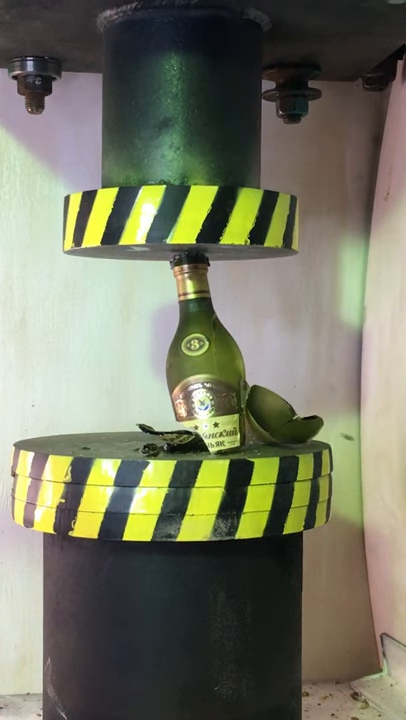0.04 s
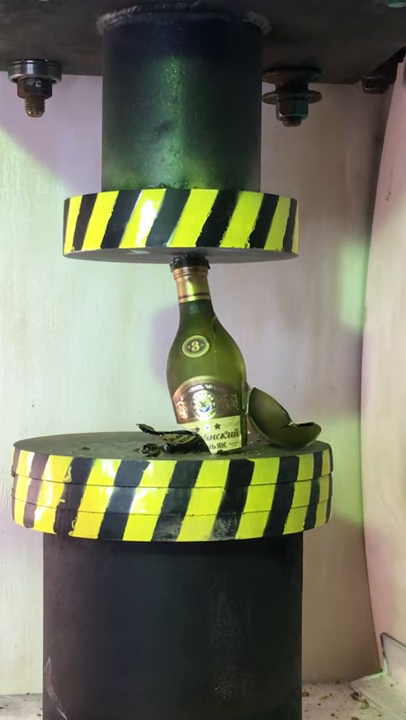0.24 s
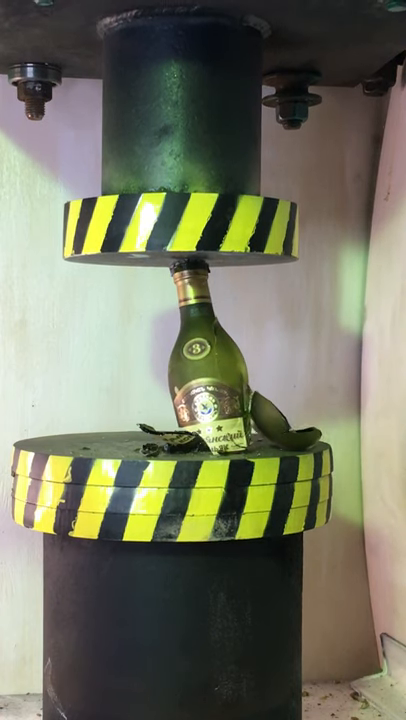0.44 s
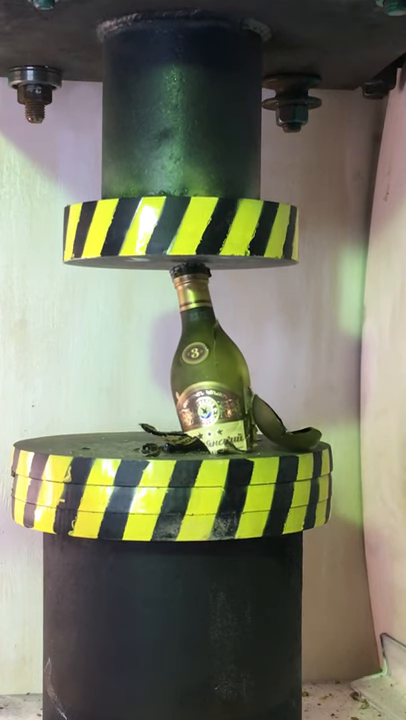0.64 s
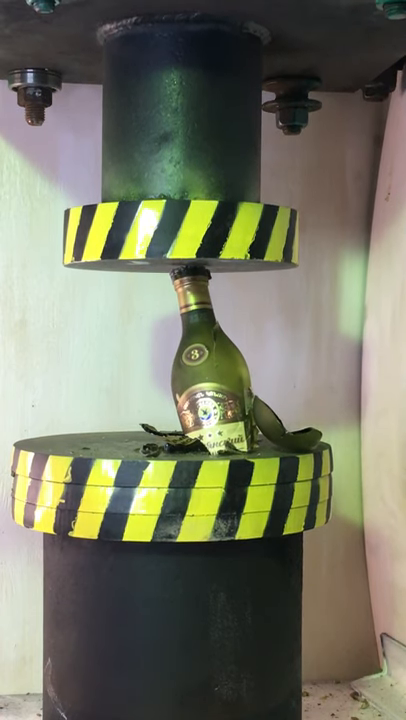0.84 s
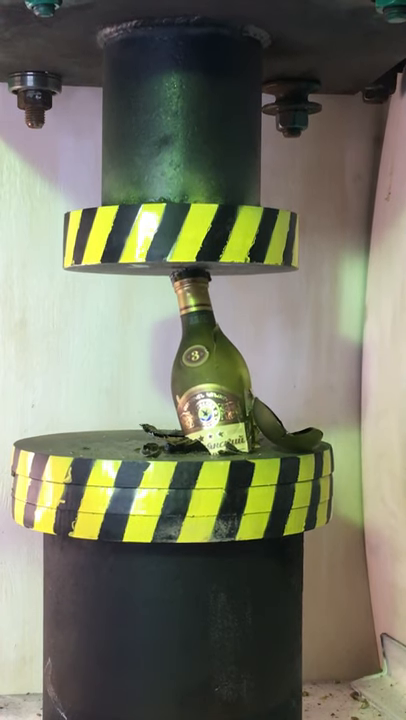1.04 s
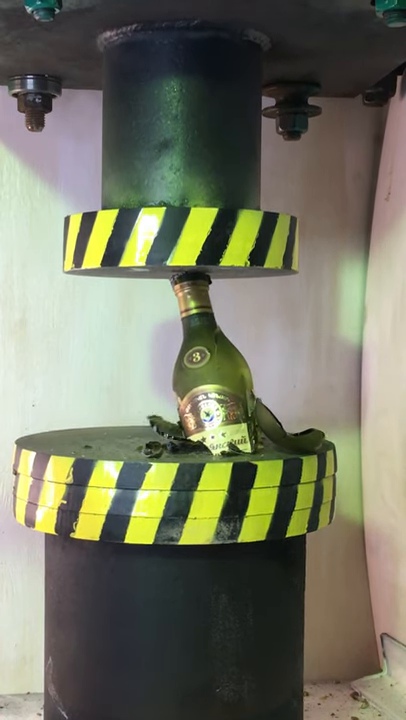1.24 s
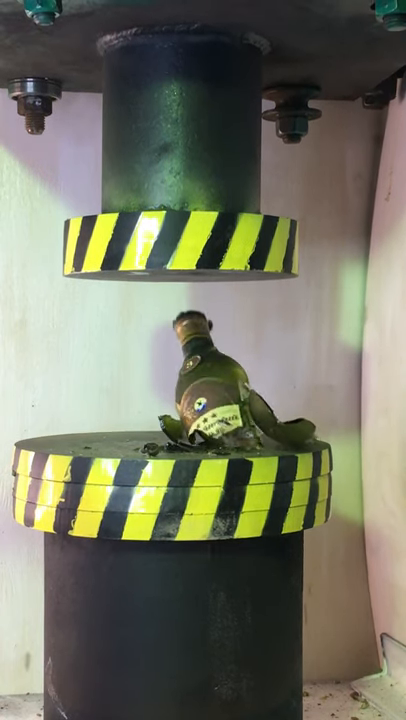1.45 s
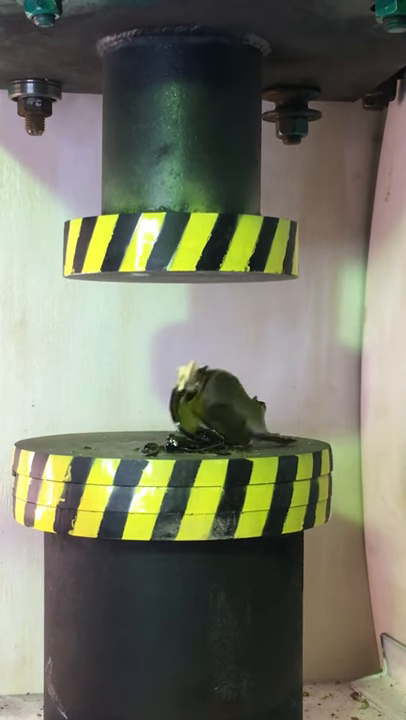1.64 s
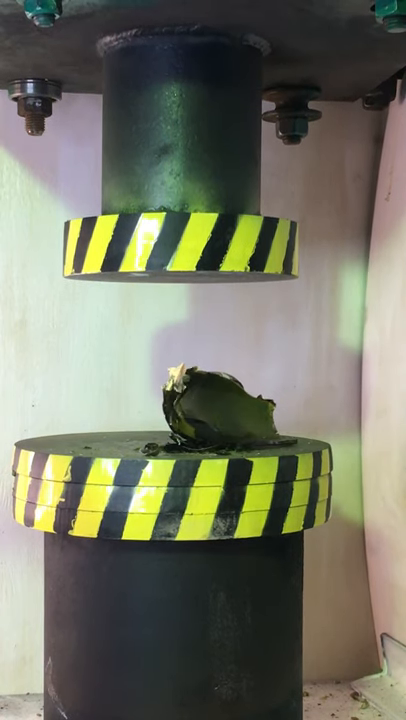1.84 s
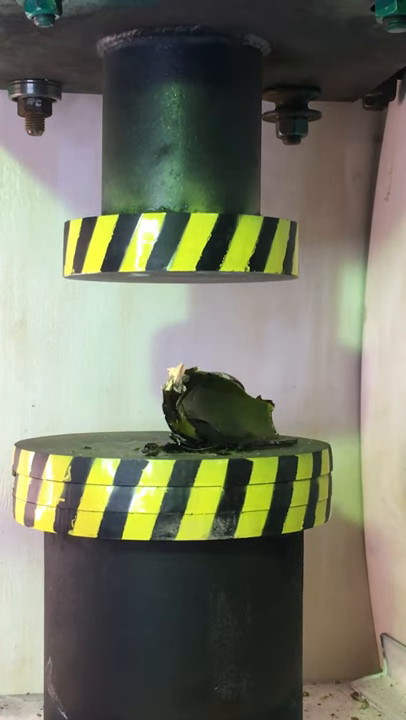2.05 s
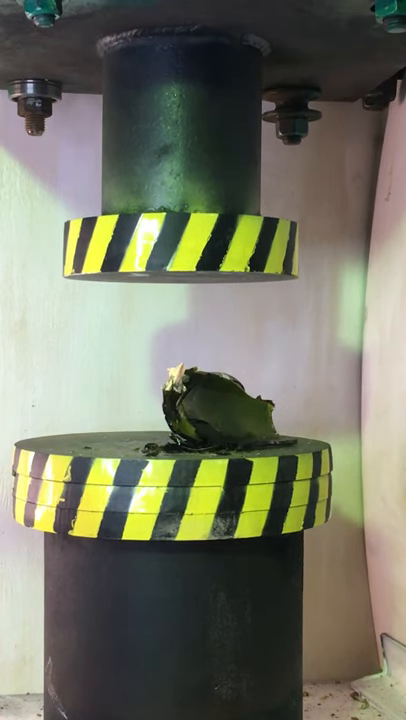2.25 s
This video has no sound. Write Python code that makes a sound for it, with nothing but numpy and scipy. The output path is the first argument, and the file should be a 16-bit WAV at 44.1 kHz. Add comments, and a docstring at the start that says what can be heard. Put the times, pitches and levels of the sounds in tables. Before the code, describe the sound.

Close mono sound of a bottle breaking in a hydraulic press; bright snaps quicken into a dense shattering crunch, shards tick afterwards, while the motor pump drones on with a dull room echo.

```python
"""In a workshop, a hydraulic press crushes a glass bottle while its pump hums: steady tones, noise and a rumble.
Clicks with short echoes make the glass crackle and snap; filtered noise makes a loose piece knock about.
The bottle bursts in heavier knocks and a dense shower of random clicks, and the press frame shudders.
A few shards tick and ring; the unloaded pump whistles briefly and for a moment runs slightly faster.
The glass also has a dull room echo."""
import sys
import numpy as np
from scipy import signal
from scipy.fft import rfft, irfft, next_fast_len
from scipy.io import wavfile
from scipy.ndimage import map_coordinates

SR = 44100
rng = np.random.default_rng(int(sys.argv[2]) if len(sys.argv) > 2 else 0)


def wav_out(sig):
    """Save sig, one row per channel (or a flat mono array), as 16-bit PCM at SR to the path in sys.argv[1]."""
    wavfile.write(sys.argv[1], SR, np.round(np.clip(np.atleast_2d(sig).T, -1, 1) * 32767).astype(np.int16))


N = 101429

BREAK_RIPPLE_DB = 4  # strength of the random resonances in the knocks and the crunch


def amp(db):
    """Turn decibels into a gain."""
    return 10 ** (np.asarray(db) / 20)


def unit(x):
    """Scale x to an average (rms) level of 1."""
    return x / np.sqrt(np.mean(x ** 2) + 1e-20)


def curve(rows):
    """Draw straight lines between (seconds, value) rows, one value per sample."""
    seconds, values = np.transpose(rows)
    return np.interp(np.arange(N) / SR, seconds, values)


def wobble(rate):
    """A smooth random curve through `rate` random points a second."""
    points = rng.standard_normal(int(N * rate / SR) + 4)
    return map_coordinates(points, [np.arange(N) * rate / SR])


def random_spectrum(hz, step_hz):
    """Random heights along the frequency axis, one every step_hz, joined by straight lines."""
    knots = np.arange(0, SR, step_hz)
    return np.interp(hz, knots, rng.standard_normal(len(knots)))


def coloured(x, points, ripple_db=0):
    """Filter x by (Hz, dB) points and random resonances, mostly narrow ones, then scale to rms 1."""
    hz = np.fft.rfftfreq(len(x), 1 / SR)
    f, db = np.transpose(points)
    broad = random_spectrum(hz, 450)
    narrow = random_spectrum(hz, 70)
    # both kinds grow with frequency, the broad ones only high up
    ripple = narrow * hz / (hz + 1000) + broad * hz / (hz + 12000)
    filter_db = np.interp(np.log(hz + 1), np.log(f), db) + ripple_db * ripple
    return unit(irfft(rfft(x) * amp(filter_db), len(x)))


def event_time():
    """Time in seconds along one short event."""
    return np.arange(8192) / SR


def add(track, s, x):
    """Mix x into the track, starting at s seconds."""
    part = track[max(round(s * SR), 0):][:len(x)]
    part += x[:len(part)]


def grains(per_s, spread_db):
    """Single-sample clicks at random moments, with random sign and uneven size."""
    happens = rng.random(N) < per_s / SR
    sign = np.sign(rng.standard_normal(N))
    return happens * sign * amp(spread_db * rng.standard_normal(N))


def pump_tones(load):
    """A turning pump sounds at multiples of its pitch; load changes the balance between them."""
    # Pump speed. Each row: time in seconds, pitch in Hz.
    pitch_hz = [(0, 178), (1.65, 178.5), (1.72, 179.3), (1.97, 179.1), (2.08, 178)]
    # Change of the whine, the tones above 2.5 times the pitch. Each row: time in seconds, change in dB.
    whine = [(0, 0), (1.35, 0.5), (1.55, -3.5), (1.65, -0.5), (1.78, -2), (1.92, -5.5), (2.0, -0.5),
             (2.3, -1.5)]
    # Change of the tone at twice the pitch. Each row: time in seconds, change in dB.
    hum = [(1.5, -0.5), (1.66, 6), (1.82, 3), (1.95, -2), (2.03, 2)]
    # Pump tones. Each row: multiple of the pitch (rounded to the nearest half when played),
    # level in dB under full load, level in dB when idle.
    orders = [(.5, -51, -47.5), (1, -42, -47.5), (1.5, -56, -47), (2.003, -38, -39), (4, -37, -38.5),
              (5, -41.5, -51), (6, -46.5, -37), (8, -38.5, -32), (10, -42, -46.5), (11, -59, -52.5),
              (12, -54.5, -49), (13, -53, -50), (14, -47, -60), (15, -53, -52), (16, -45.5, -43.5),
              (17, -45, -47), (19, -48.5, -66), (20, -57.5, -48.5)]
    waver_db, waver_hz = .8, .12  # unsteadiness of each tone's level and of the pitch
    phase = 2 * np.pi * np.cumsum(curve(pitch_hz) + waver_hz * wobble(23.74)) / SR
    whine_db, hum_db = curve(whine), curve(hum)
    tones = np.zeros(N)
    for k, loaded_db, idle_db in orders:
        halves = round(2 * k)
        db = idle_db + load * (loaded_db - idle_db)
        db = db + whine_db * (k > 2.5) + hum_db * (halves == 4) + waver_db * wobble(26.85)
        start_phase = 2 * np.pi * rng.random()
        tones += np.sqrt(2) * amp(db) * np.sin(halves / 2 * phase + start_phase)
    return tones


def pump_rush(load):
    """Oil and fan make a steady rush of noise, blended from a loaded and an idle sound."""
    # Colour of the rush under load. Each row: frequency in Hz, relative level in dB.
    loaded_colour = [(20, -36), (36, -24), (52, -5), (95, 3.5), (150, -7), (270, 2), (450, -7.5),
                     (600, -2.5), (1000, -9.5), (1450, -0.5), (2400, -8.5), (3100, -10), (4000, -15.5),
                     (5000, -23), (9500, -21.5), (11000, -40), (16000, -34)]
    # Colour of the rush when idle. Each row: frequency in Hz, relative level in dB.
    idle_colour = [(20, -26), (52, 9.5), (95, 1), (170, -1), (270, -3.5), (450, -10.5), (900, -8.5),
                   (1500, -13), (2100, -16.5), (3100, -13.5), (4200, -22), (6000, -23), (9500, -39),
                   (11500, -44), (16000, -57)]
    loaded_db, idle_db = -34.5, -35  # rms levels at full load and at no load
    loaded = amp(loaded_db) * coloured(rng.standard_normal(N), loaded_colour)
    idle = amp(idle_db) * coloured(rng.standard_normal(N), idle_colour)
    # square roots blend the two by power
    return np.sqrt(load) * loaded + np.sqrt(1 - load) * idle


def motor_rumble():
    """The motor gives one low tone whose pitch and level wander."""
    # Level of the rumble before it wanders. Each row: time in seconds, level in dB.
    level = [(0, -38), (.15, -38), (.35, -43), (.9, -44.5), (1.3, -53), (2.3, -54)]
    middle_hz = 58
    phase = 2 * np.pi * np.cumsum(middle_hz + 3 * wobble(15.5)) / SR
    return np.sqrt(2) * amp(curve(level) + 1.7 * wobble(25.5)) * np.sin(phase)


def pump():
    """The load shapes the pump's tones and rush, over the motor's rumble."""
    # How hard the pump works. Each row: time in seconds, load from 0 to 1.
    load_points = [(0, 0.88), (.4, 0.79), (1.35, 0.73), (1.55, 0.76), (1.8, 0.34), (2.0, 0.17)]
    load = np.clip(curve(load_points), 0, 1)
    return pump_tones(load) + pump_rush(load) + motor_rumble()


def click(colour, t60, chamber_db):
    """A sharp click, its echo off the plate and the ring of the chamber, as fading noise."""
    plate_s, plate_gain = .0024, .9  # delay in seconds and strength of the plate echo
    chamber_t60 = 0.11  # seconds for the ring to fall by 60 dB
    snap_ripple_db = 4.5  # strength of the random resonances
    t = event_time()
    direct = amp(-60 * t / t60)
    echo = plate_gain * (t > plate_s) * amp(-60 * abs(t - plate_s) / t60)
    chamber = amp(chamber_db - 60 * t / chamber_t60)
    shape = np.sqrt(direct ** 2 + echo ** 2 + chamber ** 2)
    ring = shape * coloured(rng.standard_normal(len(t)), colour, snap_ripple_db)
    # give the noise the same energy as its outline
    return ring * np.linalg.norm(shape) / np.linalg.norm(ring)


def fine_crackle():
    """Growing cracks make a stream of tiny random clicks with an unsteady level."""
    # Level of the crackle before it wavers. Each row: time in seconds, level in dB.
    level = [(0, -46), (.14, -46), (.175, -33), (.205, -51), (.26, -26), (.28, -35), (.33, -24.5),
             (.39, -55), (.5, -42), (.55, -50), (.6, -46), (.69, -52), (.85, -47), (.89, -43), (.98, -41),
             (1.12, -37), (1.2, -41.5), (1.32, -30), (1.46, -66), (1.7, -60), (1.745, -41), (1.8, -71)]
    # Colour of the crackle. Each row: frequency in Hz, relative level in dB.
    colour = [(300, -24), (2200, 5), (4800, -4.5), (6200, 2), (8000, -5), (10700, -2), (11400, -1.5),
              (13300, -5), (15500, -9)]
    per_s, spread_db, ripple_db = 2200, 3.3, 4  # clicks a second, scatter of size, random resonances
    crackle = coloured(grains(per_s, spread_db), colour, ripple_db)
    return amp(curve(level) + 2.1 * wobble(140)) * crackle


def cracking():
    """Each crack snaps brightly and also rings the bottle's body, amid fine crackle."""
    # Snaps of the glass. Each row: start in seconds, level in dB, mid-range body relative to the snap in dB.
    snaps = [(0.218, -26, -5), (.2395, -30, -14), (0.2508, -23, -15), (0.3414, -13.5, -18),
             (0.3743, -23.5, -22), (.437, -31, -12), (0.454, -28, -21), (0.459, -30, -6), (.476, -9, -13.5),
             (0.6542, -37, 5), (.724, -37.5, 10), (0.8038, -31.5, 1.5), (0.865, -21.5, -13),
             (.9135, -18, -5.5), (.952, -24.5, -5), (.965, -24.5, -5), (0.9738, -25, -23),
             (1.029, -21.5, -1.5), (1.136, -30, -1), (1.1624, -13, -5), (1.2206, -20, -4),
             (1.2244, -16, -2.5), (1.245, -24, -8), (1.27, -12, -9), (1.291, -15, -9), (1.3, -15.5, -16),
             (1.304, -16, -4.5), (1.3765, -23, -6)]
    # Colour of the bright snap. Each row: frequency in Hz, relative level in dB.
    snap_colour = [(300, -42), (1500, -3.5), (4500, -8), (6200, 0.5), (9000, 1), (10500, 0), (12300, 1.5),
                   (13700, -3), (15000, -1.5), (15800, 2.5)]
    # Colour of the bottle's body. Each row: frequency in Hz, relative level in dB.
    body_colour = [(200, -53), (1000, -13), (1800, -23), (2250, 4.5), (2650, 0.5), (3200, -12), (4200, -11),
                   (8000, -38)]
    snap_t60, body_t60 = 0.023, 0.015  # seconds for the direct sound to fall by 60 dB
    chamber_db = -8  # chamber ring, relative to the direct sound
    out = fine_crackle()
    for s, db, body_db in snaps:
        snap = click(snap_colour, snap_t60, chamber_db)
        body = amp(body_db) * click(body_colour, body_t60, chamber_db)
        add(out, s, amp(db) * (snap + body))
    return out


def hollow(x):
    """The bottle's curved wall boosts x around its resonances; the result has rms 1."""
    # Resonances of the bottle's wall: a plain list of frequencies in Hz.
    wall_hz = [1890, 2260, 3200, 3590]
    half_width_hz, boost_db = 70, 4.5
    hz = np.fft.rfftfreq(len(x), 1 / SR)
    lift_db = boost_db * sum(1 / (1 + ((hz - f) / half_width_hz) ** 2) for f in wall_hz)
    return unit(irfft(rfft(x) * amp(lift_db), len(x)))


def crunch():
    """A shower of fractures, gritty while the glass gives a little and dense when the bottle bursts."""
    # Dull crunch, first the loose piece, then the whole bottle. Each row: time in seconds, level in dB.
    collapse = [(.34, -70), (.365, -34.5), (.58, -36), (.8, -57), (1.325, -50.5), (1.335, -19.5),
                (1.355, -14.5), (1.385, -14), (1.42, -17.5), (1.447, -18.5), (1.475, -33), (1.57, -46.5),
                (1.61, -44.5), (1.665, -32), (1.70, -36.5), (1.9, -50.5)]
    # Colour of the crunch. Each row: frequency in Hz, relative level in dB.
    colour = [(25, -30), (60, -3), (110, 6.5), (190, -3.5), (280, 1), (1000, 0), (1900, -1.5), (3900, -4.5),
              (5000, -13.5), (6500, -14), (10000, -31), (15000, -39)]
    added_per_s, least_per_s = 6000, 200  # fractures a second: added at the loudest moment, always present
    thinning = 1.1  # the added rate follows the strength to this power
    spread_db, flutter_db = 2.2, .8  # scatter of fracture size, unsteadiness of the crunch
    strength = amp(curve(collapse))
    per_s = added_per_s * (strength / strength.max()) ** thinning + least_per_s
    # more clicks would be louder: divide so that strength alone sets the level
    fractures = grains(per_s, spread_db) / np.sqrt(per_s)
    texture = hollow(coloured(fractures, colour, BREAK_RIPPLE_DB))
    return strength * amp(flutter_db * wobble(150)) * texture


def breaking():
    """Large pieces knock, each lower band a little later than the one above, amid the crunch."""
    # Dull knocks of large pieces. Each row: start in seconds, level in dB,
    # seconds to fall by 60 dB, treble tilt in dB per octave (well above tilt_hz).
    knocks = [(0.365, -16.5, 0.052, -9.5), (0.432, -19, 0.08, -6), (0.4764, -18.5, 0.038, -12),
              (.495, -16, 0.04, -6), (.543, -13.5, 0.039, -2), (0.578, -18.5, 0.04, -12),
              (.613, -23, 0.064, -8), (.898, -24, 0.096, -8.5), (1.3302, -6, 0.035, 0),
              (1.345, -9, 0.097, 7.5), (1.352, -11.5, 0.031, -13), (1.406, -6.5, 0.062, 3.5),
              (1.4252, -6, 0.028, 4.5), (1.4961, -17, 0.042, -2), (1.656, -20, 0.075, -8.5)]
    # Colour of a knock before its tilt. Each row: frequency in Hz, relative level in dB.
    knock_colour = [(80, -19), (300, -6), (1000, -4), (2300, 0), (4100, -3), (5100, -10), (7000, -22),
                    (12000, -54)]
    # Edges between the frequency bands, from high to low: a plain list in Hz.
    band_edges = [16000, 2800, 1800, 1000, 0]
    rise_s, lag_s = .001, .0013  # time constant of the onset, delay from one band to the next
    tilt_hz = 1000
    out, t = crunch(), event_time()
    hz = np.fft.rfftfreq(len(t), 1 / SR)
    for s, db, t60, tilt_db in knocks:
        colour = [(f, level + tilt_db * np.log2(1 + f / tilt_hz)) for f, level in knock_colour]
        ring = hollow(coloured(rng.standard_normal(len(t)), colour, BREAK_RIPPLE_DB))
        shape = amp(db - 60 * t / t60) * (1 - np.exp(-t / rise_s))
        # the shaped noise gets the energy of its outline
        spectrum = rfft(ring) * np.linalg.norm(shape) / np.linalg.norm(shape * ring)
        for k, (hi, lo) in enumerate(zip(band_edges, band_edges[1:])):
            band = irfft(spectrum * (hz >= lo) * (hz < hi))
            add(out, s + k * lag_s, shape * band)
    return out


def shudder():
    """Once the load lets go the press frame shudders: a low rumble of noise that slowly dies away."""
    # Colour of the shudder. Each row: frequency in Hz, relative level in dB.
    colour = [(40, -23), (110, 1), (260, 7.5), (430, -5), (600, 6), (1500, -37)]
    start_s, start_db, t60 = 1.36, -33.5, 3.4  # t60: seconds to fall by 60 dB
    t = np.arange(N) / SR - start_s
    fade = (t > 0) * amp(start_db - 60 * abs(t) / t60)
    return fade * coloured(rng.standard_normal(N), colour)


def shards():
    """Small pieces tick on the steel as clicks; a few splinters ring as fading pure tones."""
    # Shards landing. Each row: start in seconds, level in dB.
    landings = [(1.5515, -31.5), (1.5867, -26.5), (1.61, -34), (1.651, -26), (1.693, -19), (1.7495, -33.5)]
    # Colour of a shard's tick. Each row: frequency in Hz, relative level in dB.
    tick_colour = [(1000, -16), (4200, -1), (4900, -10), (5800, 4), (9500, -3), (12500, -6), (15000, -17)]
    # Ringing splinters. Each row: start in seconds, pitch in Hz, level in dB, seconds to fall by 60 dB.
    rings = [(1.379, 12850, -20, 0.039), (1.749, 7630, -37, 0.086)]
    tick_t60, chamber_db = .012, -13.5  # seconds to fall by 60 dB, chamber ring relative to the tick
    out, t = np.zeros(N), event_time()
    for s, db in landings:
        add(out, s, amp(db) * click(tick_colour, tick_t60, chamber_db))
    for s, hz, db, t60 in rings:
        add(out, s, amp(db - 60 * t / t60) * np.sin(2 * np.pi * hz * t))
    return out


def whistle():
    """A thin oil whistle, one pure tone, swells and fades as the oil pressure falls."""
    start, end = 1.77, 1.98  # seconds
    pitch_hz, level_db = 1616, -32.5  # the swell peaks at half of this level's gain
    t = np.arange(N) / SR
    progress = np.clip((t - start) / (end - start), 0, 1)
    swell = np.sqrt(progress * (1 - progress))
    return amp(level_db) * swell * np.sin(2 * np.pi * pitch_hz * t)


def workshop(x):
    """The room answers with a dull tail: many dense echoes, imitated by fading noise."""
    # Colour of the workshop echo. Each row: frequency in Hz, relative level in dB.
    room_colour = [(80, 8), (250, 2), (1000, 2), (4000, -9), (15000, -55)]
    room_db, room_t60 = -22.5, 0.56  # echo level, seconds to fall by 60 dB
    t = np.arange(SR) / SR
    tail = coloured(rng.standard_normal(SR), room_colour) * amp(-60 * t / room_t60)
    return amp(room_db) * signal.fftconvolve(x, tail / np.linalg.norm(tail))[:N]


def scene():
    """Press and bottle in one channel; only the glass is sent to the room echo."""
    glass = cracking() + breaking() + shards()
    return (pump() + glass + shudder() + whistle() + workshop(glass))[None]


def record(dry):
    """The recorder rounds off the highest peaks and keeps nothing above its band limit."""
    ceiling, top_hz = .75, 15800
    x = dry / (1 + abs(dry / ceiling) ** 6) ** (1 / 6)
    size = next_fast_len(N + SR // 2)  # spare room after the end keeps it from wrapping to the start
    kept = np.fft.rfftfreq(size, 1 / SR) < top_hz
    return irfft(rfft(x, size) * kept, size)[:, :N]


dry = scene()
out = record(dry)
wav_out(out)
```